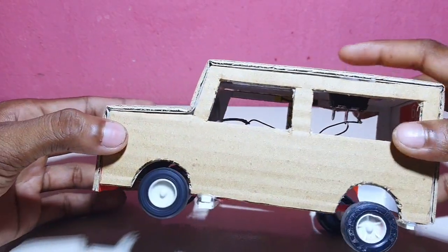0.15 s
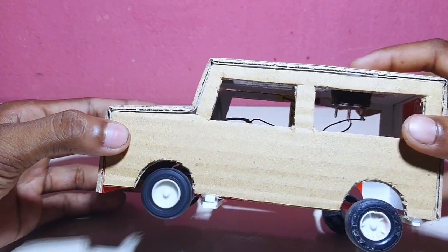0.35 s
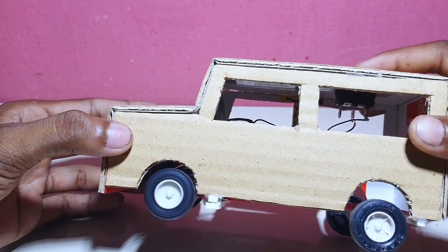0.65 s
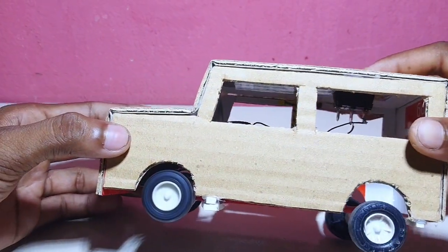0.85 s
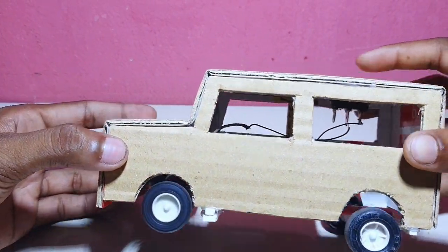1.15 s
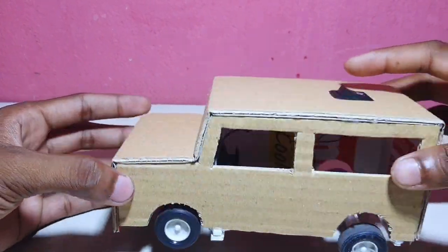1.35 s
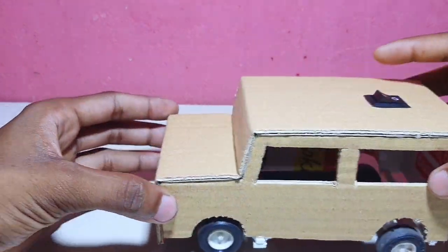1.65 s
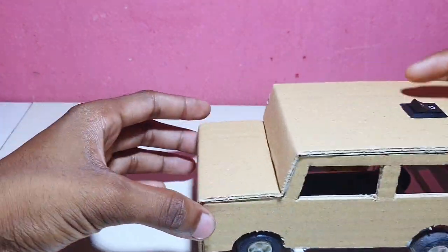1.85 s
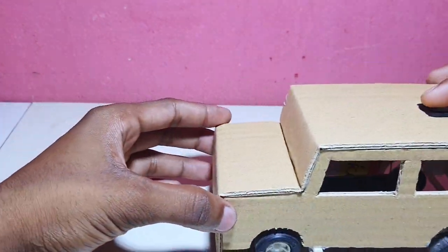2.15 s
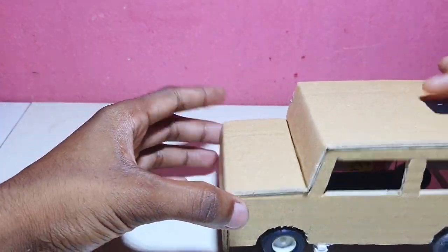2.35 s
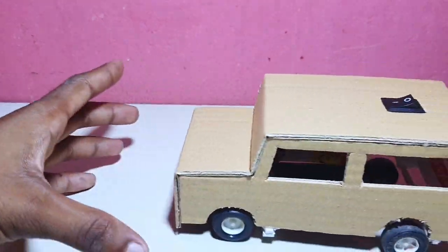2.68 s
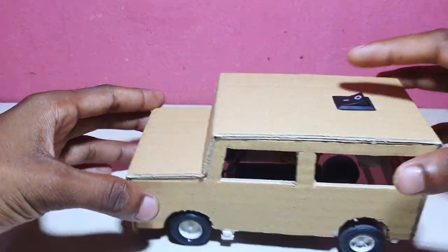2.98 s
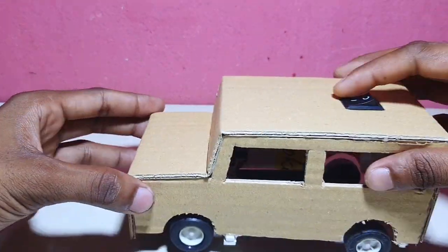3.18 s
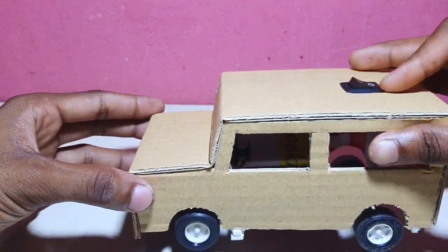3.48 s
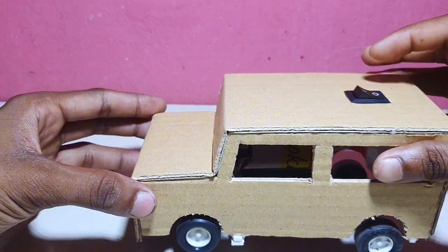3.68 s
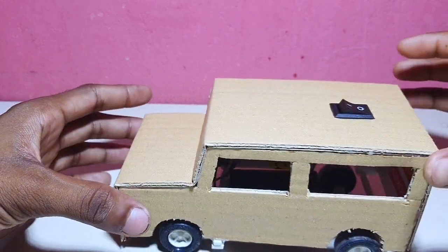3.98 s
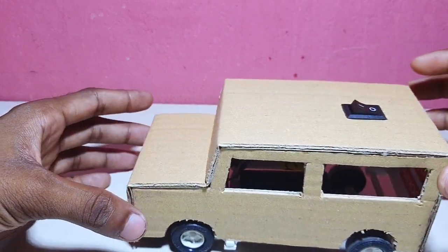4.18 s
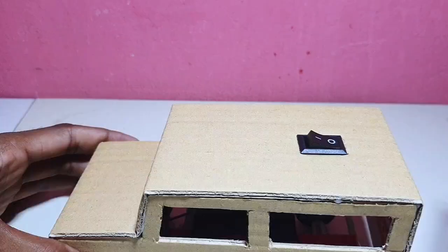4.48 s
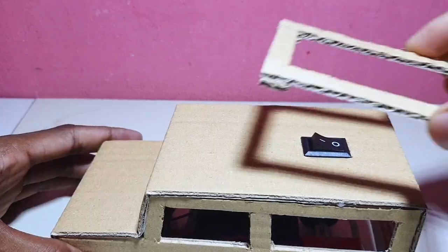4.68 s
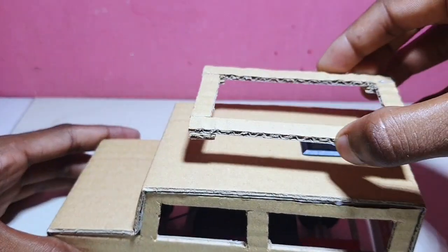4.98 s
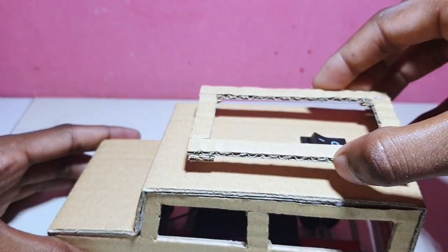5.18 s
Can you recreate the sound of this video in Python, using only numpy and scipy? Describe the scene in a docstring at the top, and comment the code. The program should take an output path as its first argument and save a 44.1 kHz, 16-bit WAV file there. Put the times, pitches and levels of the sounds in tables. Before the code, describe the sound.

Close buzzing of a tiny electric motor rises and sinks, followed by a clattering cardboard car run, a second whir, a bump and faint rustling.

```python
"""In a quiet room, a cardboard toy car with a small electric motor runs close to a two-port microphone.
Held in the air, the motor spins up and coasts down; set on a table, the car drives off rattling,
is lifted with its wheels spinning free and lands again. Faint far tones and finger rustle fill the pauses.
Harmonics of the rotor and noise modulated at its turns excite resonances of shell, can and brushes;
tread slaps and impacts excite those of car and table. A reverberant tail and room air complete the field."""
import sys
import numpy as np
from scipy import signal
from scipy.fft import rfft, irfft, next_fast_len
from scipy.io import wavfile
from scipy.ndimage import uniform_filter1d

SR = 44100
rng = np.random.default_rng(int(sys.argv[2]) if len(sys.argv) > 2 else 0)


def inscribe(sig):
    """Save sig as 16-bit PCM at rate SR to the path in sys.argv[1].

    A 1-D sig is mono; a 2-D sig holds one channel per row.
    Samples are clipped to [-1, 1] before scaling.
    """
    pcm = np.round(np.clip(np.atleast_2d(sig).T, -1, 1) * 32767)
    wavfile.write(sys.argv[1], SR, pcm.astype(np.int16))


N = 235265

# Levels in the tables are relative drive levels unless a comment says otherwise.
# Armature speed, one table a run: start_s, speed_turns_per_s
ARMATURE_RUNS = [
    [(0, 65.7), (.08, 85.8), (.152, 99.1), (.23, 116.8), (.29, 127.8), (.358, 136.7), (.496, 148.2),
     (.654, 153.9), (.888, 158.8), (.948, 144.2), (1.082, 112.1), (1.182, 95.8), (1.296, 73.7), (1.45, 55),
     (1.6, 42), (1.76, 32)],
    [(2.75, 84.8), (3.05, 92.9), (3.154, 98.4), (3.258, 124), (3.336, 136), (3.402, 142.7), (3.504, 124.6),
     (3.632, 99.4), (3.772, 74.5), (3.82, 67.9)],
]
# Clean rotor harmonics: multiple_of_turn_rate, level_db, change_while_coasting_db
ROTOR_HARMONICS = [(2, -10, -3), (4, -40, -1), (5, -38, 2), (6, -30, 1), (8, -40.5, 6), (9, -39.5, 2),
                   (10, -36, -2), (12, -40, 0), (14, -46, 2), (16, -49, 2)]
# Transmission of a tone through the held shell: frequency_hz, gain_db
SHELL_TRANSMISSION = [(130, -51), (170, -36.5), (225, -26), (320, -21), (400, -23.5), (480, -32.5),
                      (545, -11), (595, 0.2), (660, -6), (730, -9), (790, -17), (850, -11.5), (960, -18.5),
                      (1100, -9.5), (1270, -1.5), (1340, 4), (1450, -2.5), (1650, -10.5), (1870, -5),
                      (2300, -14.5)]
# Armature whine: multiple_of_turn_rate, level_db
WHINE_PARTIALS = [(3, -14), (7, -5), (11, 0), (13, -3), (15, -5), (18, -5), (20, -8)]

# Resonances, each: frequency_hz, width_hz (before any broadening), level_db
# of the car held in the hands
SHELL_MODES = [(599, 12, 2.5), (822, 42, -6), (1317, 32.6, 0.5), (1423, 66, -1), (1550, 370, -5.5),
               (1784, 65, 2), (2237, 390, -6.5), (2440, 62, -2.5), (2654, 150, -14)]
# of the motor can in the first grip
CAN_MODES = [(3350, 280, 0), (3700, 280, -3), (4030, 280, -1), (4300, 300, -1), (4900, 500, -9)]
# of the motor can in the second grip
CAN_MODES_REGRIPPED = [(3050, 300, -10), (3600, 350, -6), (4200, 350, 0), (4500, 350, -2), (5200, 400, -14)]
# of the brushes
BRUSH_MODES = [(8740, 2200, -2), (9230, 160, 10), (10160, 330, 2), (11870, 290, 1.5), (12700, 240, 6.5),
               (14400, 700, 0), (14200, 620, -10.5), (15000, 480, 0)]
# of the bearing
BEARING_MODES = [(6530, 740, 0.5), (6260, 820, 13)]
# of the roof under the switch
ROOF_MODES = [(620, 160, 0), (820, 190, 0), (1300, 300, -8)]
# of car and table top together
BODY_MODES = [(318, 19, 0.5), (702.3, 65, -3.5), (977, 160, -10), (1257.7, 24, 3.5), (1353, 70, 2.5),
              (1565, 180, -6.5), (1657, 150, -11), (1942, 73, -2.5), (2266, 37, -8.5), (2483, 120, -8.5),
              (2880, 210, -10.5), (3546, 200, -7.5), (4270, 190, -13.5), (4330, 47, -14.5),
              (4680, 110, -12), (5420, 51, -14), (5950, 72, -15), (6700, 400, -23.5)]
# of the table top
TABLE_MODES = [(65.7, 28, -8.5), (88, 19, -2.5), (133.3, 21, -0.5), (219, 25, -20), (234, 20, -9.5),
               (423, 21, -7.5)]
# bright bands that filter tread sizzle, impact cracks and finger rustle
BRIGHT_BANDS = [(8880, 310, -1), (12500, 280, -5.5), (15830, 270, -4), (14000, 240, -2), (16850, 37, -2)]

# Rocker switch (off, on, off): start_s, knock_db, snap_re_knock_db
SWITCH_THROWS = [(0.8924, -10.5, 6), (2.245, -29, 6), (3.412, -21, 10)]
# The car drives off: start_s, table_rumble_db, body_rattle_db, tread_sizzle_db
DRIVE_LEVELS = [(2.27, -59.5, -35, -47), (2.334, -32.5, -21.5, -37), (2.43, -29.5, -25, -32.5),
                (2.51, -28.5, -27, -29.5), (2.61, -30.5, -26, -27.5), (2.8, -35, -24, -28),
                (3.036, -36.5, -29.5, -27.5), (3.122, -41.5, -26.5, -26), (3.165, -43.5, -49.5, -41),
                (3.2, -47, -38, -58)]
# Wheels hop and go quiet: touchdown_s, time_in_air_s
WHEEL_HOPS = [(2.441, 0.011), (2.481, .028), (2.533, .022), (2.588, .022), (2.646, 0.024), (2.736, 0.011)]
# Wheels scuff the table: start_s, length_s, table_rumble_db, body_rattle_db, tread_sizzle_db
WHEEL_SCUFFS = [(1.48, 0.038, -43, -31.5, -43.5), (1.585, 0.0052, -44.5, -35, -51),
                (1.804, 0.017, -35.5, -63, -56), (3.815, .1, -32.5, -28.5, -34.5)]
# Bumps and landings: start_s, impact_db, thud_re_impact_db, brightness_db
IMPACTS = [(1.451, -20, -51, -9.5), (1.466, -16.5, -27.5, -6), (1.585, -40, -21, -18),
           (1.598, -28, -31, -10), (1.764, -23, -17, -22), (1.801, -16.5, -5, -18),
           (1.826, -32.5, 2.5, -30), (2.001, -53.5, -4.5, -4.5), (2.277, -22, -17.5, -25),
           (2.301, -16.5, -15, -12.5), (2.445, -6, -27.5, -17), (2.484, -16.5, -15, -13),
           (2.493, -8, -20.5, -19), (2.51, -10, -20.5, -20), (2.533, -17, -22, -18.5),
           (2.548, -5.5, -12, -29), (2.593, -13, -10.5, -9), (2.609, -10.5, -15, -9),
           (2.644, -10.5, -21.5, -10.5), (2.654, -12.5, -25, -16.5), (2.685, -16, -19, -2),
           (2.71, -15.5, -12.5, -13), (2.737, -23, -21, -17.5), (3.823, -33.5, -14, 10),
           (3.865, -15.5, 1, -14.5), (3.909, -22.5, -14, -30), (5.002, -53.5, -11, -20)]
# Fingers brush the cardboard: crest_s, level_db
FINGER_STROKES = [(4.52, -70), (4.614, -70), (4.698, -70), (4.92, -80), (5.006, -77)]
# A far low hoot recurs: start_s, level_db
HOOT_CALLS = [(2.03, -73), (4.16, -72.5), (4.34, -74), (4.49, -78), (4.66, -78), (4.83, -75.5),
              (5.0, -67.5), (5.18, -69)]
# A far high chirp recurs: start_s, level_db
CHIRP_CALLS = [(2.1, -84), (4.17, -87), (4.44, -92), (4.66, -85), (4.84, -93)]
# Other faint tones, among them short rings of soft knocks near 2.0, 4.5 and 5.0 s: start_s, length_s, start_hz,
# end_hz, level_db
FAINT_TONES = [(1.996, 0.034, 687, 734, -62), (4.053, 0.22, 451, 427, -75), (4.239, .12, 440, 418, -70),
               (4.269, 0.13, 654, 644, -75), (4.501, 0.051, 597, 590, -65), (4.989, 0.027, 734, 673, -52.5),
               (5.0, .09, 10200, 12700, -89), (5.158, 0.067, 12600, 11730, -75.5)]
# Room air over time: start_s, level_db
AIR_LEVELS = [(0, -49.5), (1.9, -58.5), (2.2, -60), (4.1, -57.5), (4.49, -62), (4.52, -53), (4.65, -53),
              (4.8, -59), (5.33, -57.5)]
# Spectral shape of the room air: frequency_hz, density_db_per_hz
AIR_SPECTRUM = [(24, -49.5), (40, -23), (71, -3.5), (137, -4), (167, -13), (204, -5.5), (354, -19),
                (422, -23), (516, -24), (630, -19), (715, -34), (873, -24), (1300, -34.5), (5580, -55.5),
                (16000, -49)]
# Shadow of the housing on the right port, before scaling: frequency_hz, loss_db
PORT_SHADOW = [(60, 16), (110, -12.5), (200, 1), (380, 4), (700, 2), (1290, 3.5), (2380, 11), (4400, 9.5),
               (8120, 20.5), (15000, 29)]

# Rotor: reference speed of the levels (turns/s), level slope, random waver, relative speed waver
FULL_TURNS_PER_S = 150
TONE_DB_PER_OCTAVE, TONE_WAVER_DB, SPEED_WAVER = 4, 2, .003
# Chatter of the rotor in its play: threshold under current, threshold coasting, softness (turns/s)
CHATTER_POWERED, CHATTER_COASTING, CHATTER_SPREAD = 104, 96, 2.5
# Noise laws: level_db at reference speed, slope_db_per_octave, change_without_chatter_db, second_grip_db
GEAR_LAW, HISS_LAW, KNOCK_LAW = (-31, 9, -6.5, -0.5), (-30, 14, -3, -3.5), (-29, -1, -44, -1)
REGRIP_S = 2
WHINE_SHARE = 0.4  # amplitude against the gear noise
# Bearing ticks: centre speed and half range (turns/s), level
TICK_TURNS_PER_S, TICK_RANGE, TICK_DB = 91, 10, -45

TREAD_SLAPS_PER_S = 80  # mean rate
HOP_RATTLE_DB, HOP_SIZZLE_DB = -10, -13
SCUFF_FADE_DB_PER_S, RUMBLE_SMOOTHING_S = 382.5, .03
UPPER_MODES_HZ = 2700
BRUSH_RISE_S, BRUSH_FADE_S = 0.0076, 0.018  # time constants
HOOT_S, HOOT_HZ, HOOT_END_HZ = .07, 876, 860
CHIRP_S, CHIRP_HZ = .09, 5630
AIR_PAN_DB = 7.5  # left port over right
ROOM_T60_S, ROOM_DB, ROOM_LOW_HZ, ROOM_DULL_HZ = .2, -11, 730, 6000
LOW_CUT_HZ, CUTOFF_HZ = 55, 15750
RIGHT_LAG_S, SCATTER_HZ, SCATTER_S = .00008, 5500, .05


def motor():
    """Superposition: clean harmonics, resonant noise and ticks all follow one rotor phase."""
    speed, turns, coasting, calm, gate = rotor()
    tones = rotor_tones(speed, turns, coasting)
    gear = gear_noise(turns) + WHINE_SHARE * armature_whine(turns)
    noise = noise_gain(GEAR_LAW, speed, calm) * gear
    noise += noise_gain(HISS_LAW, speed, calm) * brush_hiss(turns)
    noise += noise_gain(KNOCK_LAW, speed, calm) * rotor_knock(turns)
    return gate * (tones + noise + bearing_tick(speed, turns))


def rotor():
    """Kinematics: phase integrates speed; hysteresis lowers the chatter threshold while coasting."""
    (speed,), gate = in_time(ARMATURE_RUNS)
    t = np.arange(N) / SR
    turns = np.cumsum(speed * (1 + SPEED_WAVER * wander(25))) / SR
    off_s, on_s, off_again_s = np.array(SWITCH_THROWS)[:, 0]
    current_cut = (t > off_s) & (t < on_s) | (t > off_again_s)
    coasting = uniform_filter1d(1. * current_cut, size=900)
    threshold = CHATTER_POWERED + coasting * (CHATTER_COASTING - CHATTER_POWERED)
    calm = 1 / (1 + np.exp((speed - threshold) / CHATTER_SPREAD))
    return speed, turns, coasting, calm, gate


def noise_gain(law, speed, calm):
    """Power law: level rises or falls by fixed decibels per octave of speed."""
    level_db, slope_db, calm_db, grip_db = law
    regripped = np.arange(N) / SR > REGRIP_S
    octaves = np.log2(speed / FULL_TURNS_PER_S)
    return from_db(level_db + slope_db * octaves + calm_db * calm + grip_db * regripped)


def rotor_tones(speed, turns, coasting):
    """Harmonic series: each multiple of the turn rate is weighted by the shell's transmission."""
    hz, passed_db = np.transpose(SHELL_TRANSMISSION)
    speed_db = TONE_DB_PER_OCTAVE * np.log2(speed / FULL_TURNS_PER_S)
    tones = 0
    for multiple, db, coast_db in ROTOR_HARMONICS:
        level_db = db + coast_db * coasting + speed_db + np.interp(multiple * speed, hz, passed_db)
        level_db = level_db + TONE_WAVER_DB * wander(20)
        phase = 2 * np.pi * (multiple * turns + rng.random())
        tones = tones + from_db(level_db) * np.sqrt(2) * np.sin(phase)
    return tones


def armature_whine(turns):
    """Resonance: a partial swells as it passes a mode of the shell."""
    partials = sum(from_db(db) * np.sin(2 * np.pi * (multiple * turns + rng.random()))
                   for multiple, db in WHINE_PARTIALS)
    return even(resonate(partials, SHELL_MODES, widen=2))


def gear_noise(turns):
    """Amplitude modulation: noise swelling once a turn excites the shell."""
    return even(resonate(gated_noise(turns, sharp=.8, steady=.8, uneven_db=2), SHELL_MODES, widen=2.5))


def rotor_knock(turns):
    """Impulse excitation: the rotor strikes its play once a turn and scrubs, ringing the can."""
    strikes = np.diff(np.floor(turns), prepend=0) * from_db(1.5 * rng.standard_normal(N))
    scrub = gated_noise(turns - .1, sharp=2.5, steady=.75, uneven_db=1.2)
    blows = .7 * rms_one(strikes) + rms_one(scrub)
    first_grip = resonate(blows, CAN_MODES, widen=1.2)
    second_grip = resonate(blows, CAN_MODES_REGRIPPED, widen=1.2)
    return even(np.where(np.arange(N) / SR < REGRIP_S, first_grip, second_grip))


def bearing_tick(speed, turns):
    """Speed selectivity: two noise pulses a turn ring the bearing only near one speed, in the first grip."""
    tick = even(resonate(gated_noise(2 * turns, sharp=3, steady=.15, uneven_db=2), BEARING_MODES))
    near_speed = np.exp(-((speed - TICK_TURNS_PER_S) / TICK_RANGE) ** 4)
    return from_db(TICK_DB) * tick * near_speed * (np.arange(N) / SR < REGRIP_S)


def brush_hiss(turns):
    """Amplitude modulation: brush noise swells twice a turn through its high resonances."""
    return even(resonate(gated_noise(2 * turns, sharp=0.75, steady=0.34, uneven_db=0.5), BRUSH_MODES))


def switch():
    """Impulse excitation: the rocker knocks the roof modes and snaps in a bright band."""
    _, knock_db, snap_db = np.transpose(SWITCH_THROWS)
    snap_band = signal.butter(2, [3000, 12000], "band", fs=SR, output="sos")
    snap = signal.sosfilt(snap_band, burst(SWITCH_THROWS, knock_db + snap_db - 8, .002))
    return resonate(burst(SWITCH_THROWS, knock_db + 21, .00003), ROOF_MODES) + snap


def rolling():
    """Forced vibration: tread slaps sizzle and shake the loose body; the table drums, unlike at each port."""
    rumble_gain, rattle_gain, sizzle_gain = contact()
    slaps = np.arange(N) * TREAD_SLAPS_PER_S / SR + 0.64 * wander(25)
    tread_noise = gated_noise(slaps, sharp=4.4, steady=0.55, uneven_db=3.5)
    sizzle = even(resonate(tread_noise, BRIGHT_BANDS, widen=4.8))
    body_noise = gated_noise(slaps, sharp=2.8, steady=.9, uneven_db=3.5)
    rattle = even(resonate(body_noise, BODY_MODES, widen=1.2, patchy_db=2.5))
    table_noise = rng.standard_normal(N) + 0.45 * rng.standard_normal((2, N))
    rumble = even(resonate(table_noise, TABLE_MODES, widen=0.37))
    return rattle_gain * rattle + sizzle_gain * sizzle, rumble_gain * rumble


def contact():
    """Contact excitation: gains of rattle and sizzle dip in hops; scuffs hold, then decay."""
    t = np.arange(N) / SR
    levels_db, gate = in_time([DRIVE_LEVELS])
    in_air = sum(1. * (t > touchdown_s - air_s) * (t < touchdown_s) for touchdown_s, air_s in WHEEL_HOPS)
    airborne = uniform_filter1d(in_air, size=120)
    gains = gate * from_db(levels_db + np.outer([0, HOP_RATTLE_DB, HOP_SIZZLE_DB], airborne))
    for start_s, length_s, *scuff_db in WHEEL_SCUFFS:
        fade_db = SCUFF_FADE_DB_PER_S * np.maximum(t - start_s - length_s, 0)
        gains = gains + (t > start_s) * from_db(np.subtract.outer(scuff_db, fade_db))
    keep = np.exp(-1 / (RUMBLE_SMOOTHING_S * SR))
    rumble_gain = signal.lfilter([1 - keep], [1, -keep], gains[0])
    return rumble_gain, gains[1], gains[2]


def bumps():
    """Modal excitation by impact: a short scrub rings the body, thuds in the table and cracks brightly."""
    _, impact_db, thud_db, bright_db = np.transpose(IMPACTS)
    lower_modes = [mode for mode in BODY_MODES if mode[0] < UPPER_MODES_HZ]
    upper_modes = [mode for mode in BODY_MODES if mode[0] >= UPPER_MODES_HZ]
    body = resonate(burst(IMPACTS, impact_db + 10, 0.0074), lower_modes, widen=0.99, patchy_db=-0.5)
    body += resonate(burst(IMPACTS, impact_db + bright_db + 17, .01), upper_modes, widen=1.4, patchy_db=3)
    thud_modes = TABLE_MODES + BODY_MODES[:1]
    thud = resonate(burst(IMPACTS, impact_db + thud_db + 12.5, 0.0085), thud_modes, widen=1.6)
    crack = resonate(burst(IMPACTS, impact_db + bright_db + 3, 0.0041), BRIGHT_BANDS, widen=18.0)
    return body + thud + crack


def rustle():
    """Friction noise: skin on the paper face swells to a crest and fades exponentially."""
    t = np.arange(N) / SR
    strokes = sum(from_db(db) * np.exp(-np.maximum((crest_s - t) / BRUSH_RISE_S, (t - crest_s) / BRUSH_FADE_S))
                  for crest_s, db in FINGER_STROKES)
    return strokes * rms_one(resonate(rng.standard_normal(N), BRIGHT_BANDS, widen=9.8))


def far_tones():
    """Frequency modulation: random jitter of pitch roughens short, softly windowed tones."""
    out = np.zeros(N)
    hoots = [(start_s, HOOT_S, HOOT_HZ, HOOT_END_HZ, db) for start_s, db in HOOT_CALLS]
    chirps = [(start_s, CHIRP_S, CHIRP_HZ, CHIRP_HZ, db) for start_s, db in CHIRP_CALLS]
    for start_s, length_s, start_hz, end_hz, level_db in hoots + chirps + FAINT_TONES:
        hz = np.linspace(start_hz, end_hz, round(length_s * SR))
        jitter = uniform_filter1d(rng.standard_normal(12000), size=300)[:len(hz)]
        hz = hz * (1 + 0.11 * jitter)
        tone = np.hanning(len(hz)) * np.sin(2 * np.pi * np.cumsum(hz) / SR)
        out[round(start_s * SR):][:len(hz)] += from_db(level_db + 8.5) * tone
    return out


def room(x):
    """Reverberation: a decaying noise response of its own for each side, thin in bass and dull on top."""
    t = np.arange(round(.4 * SR)) / SR
    tails = rng.standard_normal((2, len(t))) * from_db(-60 * t / ROOM_T60_S) * (t > .002)
    band = signal.butter(1, [ROOM_LOW_HZ, ROOM_DULL_HZ], "band", fs=SR, output="sos")
    tails = signal.sosfilt(band, tails)
    return signal.fftconvolve(x[None], tails / np.sqrt(np.sum(tails ** 2) / 2), axes=1)[:, :N]


def air():
    """Partial coherence: shaped room noise is mostly shared by both ports."""
    (level_db,), _ = in_time([AIR_LEVELS])
    shared, own = rng.standard_normal(N), rng.standard_normal((2, N))
    pan_db = AIR_PAN_DB * np.array([[.5], [-.5]])
    return from_db(level_db + pan_db) * rms_one(shape(shared + .45 * own, AIR_SPECTRUM))


def from_db(db):
    """Logarithmic level: decibels to amplitude gain."""
    return 10 ** (np.asarray(db) / 20)


def rms_one(x):
    """Effective value: scale to rms 1."""
    return x / np.sqrt(np.mean(x ** 2) + 1e-20)


def even(x):
    """Level normalization: divide by the rms over about 60 ms, so that a gain curve alone sets the level."""
    return x / np.sqrt(uniform_filter1d(x ** 2, size=2600) + 1e-12)


def wander(per_s):
    """Random modulation: straight lines join Gaussian knots of spread 1."""
    knots = rng.standard_normal(round(per_s * N / SR) + 2)
    return np.interp(np.arange(N) * per_s / SR, np.arange(len(knots)), knots)


def in_time(tables):
    """Linear interpolation: columns at every sample, and a gate open inside the tables."""
    t = np.arange(N) / SR
    s, *columns = np.concatenate(tables).T
    gate = sum((t >= rows[0][0]) & (t <= rows[-1][0]) for rows in tables)
    return [np.interp(t, s, c) for c in columns], uniform_filter1d(gate * 1., size=200)


def gated_noise(turns, sharp, steady, uneven_db):
    """Amplitude modulation: noise swells once a cycle, every swell with its own strength."""
    swell = np.exp(sharp * (np.cos(2 * np.pi * turns) - 1))
    strength = from_db(uneven_db * rng.standard_normal(N)[np.round(turns).astype(int)])
    return (steady + swell * strength) * rng.standard_normal(N)


def burst(rows, level_db, decay_s):
    """Exponential decay: a click at each row's time is trailed by noise that dies away."""
    starts = np.zeros(N)
    starts[np.round(np.array(rows)[:, 0] * SR).astype(int)] = from_db(level_db)
    envelope = signal.lfilter([1], [1, -np.exp(-1 / (decay_s * SR))], starts)
    return 2 * starts + envelope * rng.standard_normal(N)


def resonate(x, modes, widen=1., patchy_db=0.):
    """Modal superposition: parallel resonances of alternating sign; patchy drive wavers for each mode."""
    out = 0
    for k, (hz, width_hz, level_db) in enumerate(modes):
        radius = np.exp(-np.pi * max(width_hz * widen, 5) / SR)
        poles = [1, -2 * radius * np.cos(2 * np.pi * hz / SR), radius * radius]
        drive = x * from_db(patchy_db * wander(30)) if patchy_db else x
        ringing = signal.lfilter([1, 0, -1], poles, drive + 1e-18)
        # the last factor gives unit gain at the peak
        out = out + (-1) ** k * from_db(level_db) * (1 - radius * radius) / 2 * ringing
    return out


def shape(x, points, sign=1, lag_s=0.):
    """Linear filtering: multiply the spectrum by a (hz, db) curve and a delay phase."""
    size = next_fast_len(N)
    hz = np.fft.rfftfreq(size, 1 / SR) + 1  # offset avoids log of zero
    curve_hz, curve_db = np.array(points).T[:2]
    gain = from_db(sign * np.interp(np.log(hz), np.log(curve_hz), curve_db))
    delay = np.exp(-2j * np.pi * hz * lag_s)
    return irfft(rfft(x, size) * gain * delay, size)[..., :N]


def scene():
    """Superposition: direct sound, its reverberation and table rumble share a low cut; air is added."""
    rattle, rumble = rolling()
    near = motor() + rattle + bumps() + switch() + rustle() + far_tones()
    low_cut = signal.butter(2, LOW_CUT_HZ, "high", fs=SR, output="sos")
    return signal.sosfilt(low_cut, near + from_db(ROOM_DB) * room(near) + rumble) + air()


def record(dry):
    """Diffraction: the right port hears later and duller, its treble by scattered paths; the top is cut."""
    half_shadow = [(hz, np.clip(loss_db / 2, -6, 6)) for hz, loss_db in PORT_SHADOW]
    left = shape(dry[0], half_shadow)
    right = shape(shape(dry[1], half_shadow), PORT_SHADOW, sign=-0.85, lag_s=RIGHT_LAG_S)
    low, high = (signal.sosfilt(signal.butter(4, SCATTER_HZ, kind, fs=SR, output="sos"), right)
                 for kind in ("low", "high"))
    paths = rng.standard_normal(9000) * np.exp(-np.arange(9000) / (SCATTER_S * SR))
    right = low + signal.fftconvolve(high, paths / np.linalg.norm(paths))[:N]
    top_cut = signal.ellip(12, .5, 70, CUTOFF_HZ, fs=SR, output="sos")
    return signal.sosfilt(top_cut, np.array([left, right]))


dry = scene()
out = record(dry)
inscribe(out)
```